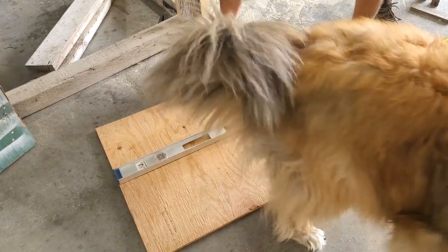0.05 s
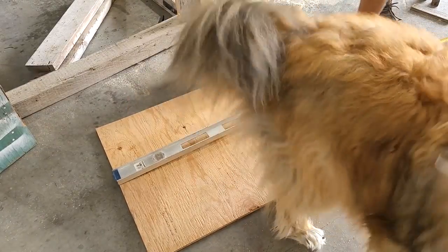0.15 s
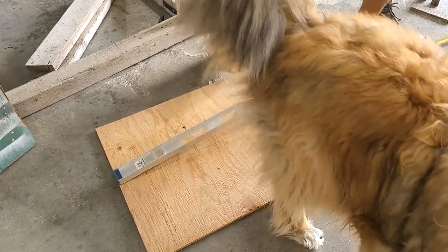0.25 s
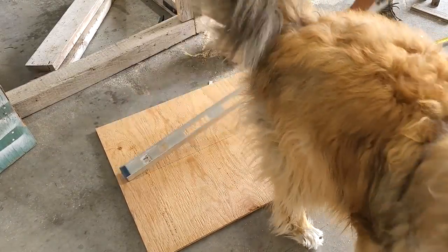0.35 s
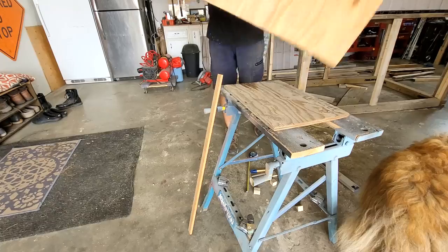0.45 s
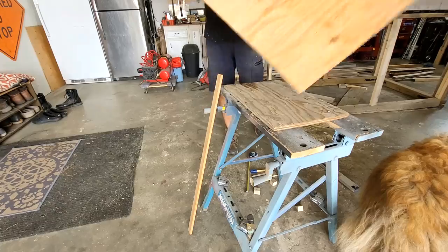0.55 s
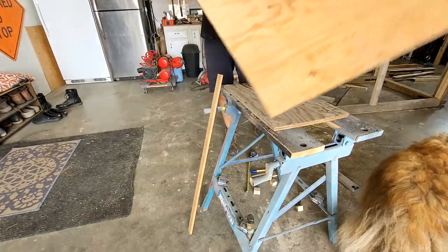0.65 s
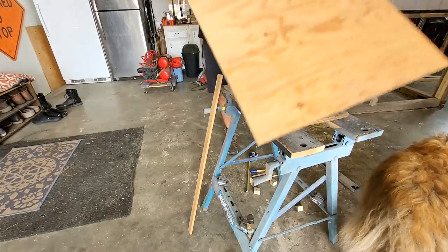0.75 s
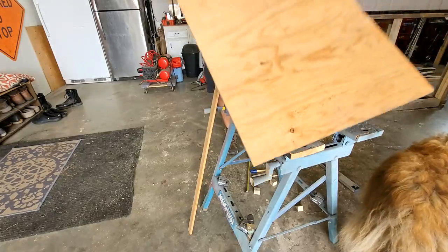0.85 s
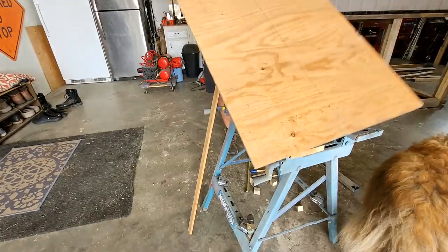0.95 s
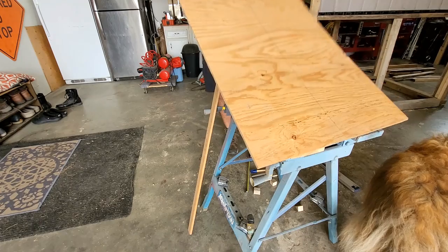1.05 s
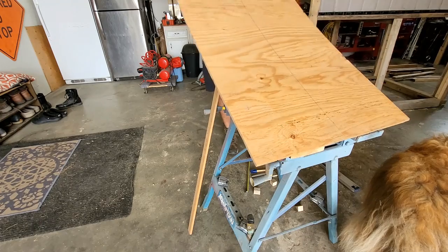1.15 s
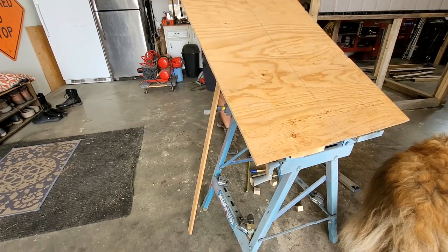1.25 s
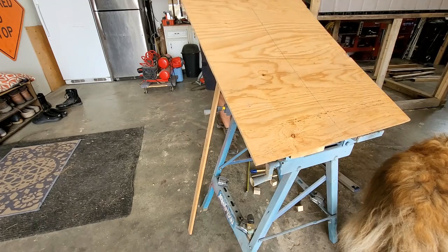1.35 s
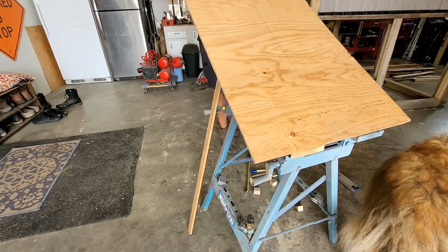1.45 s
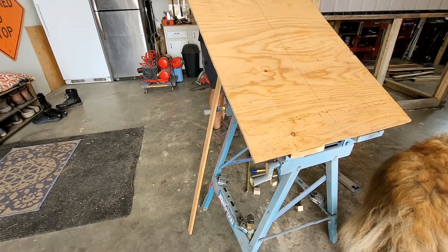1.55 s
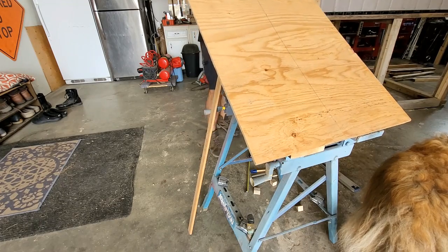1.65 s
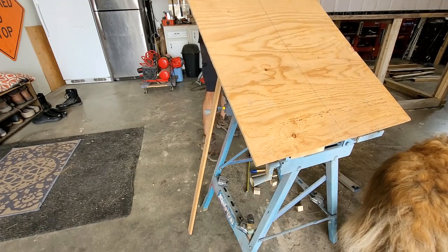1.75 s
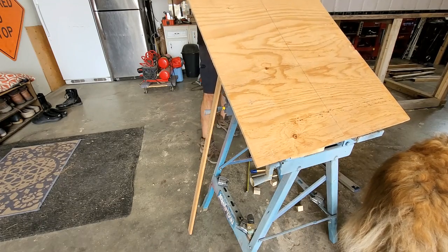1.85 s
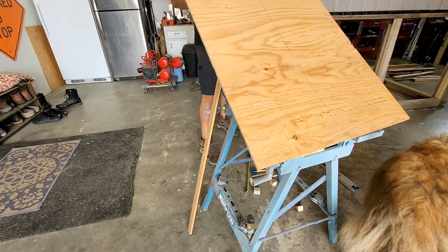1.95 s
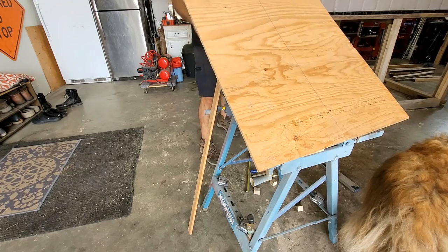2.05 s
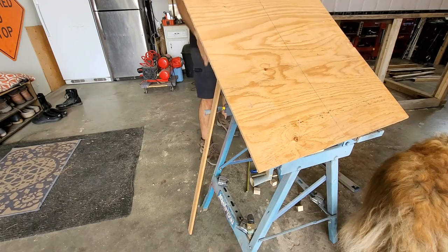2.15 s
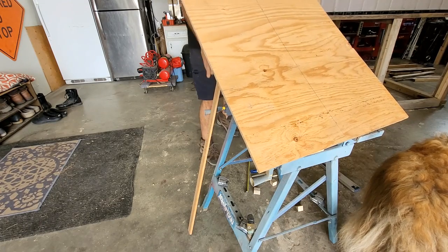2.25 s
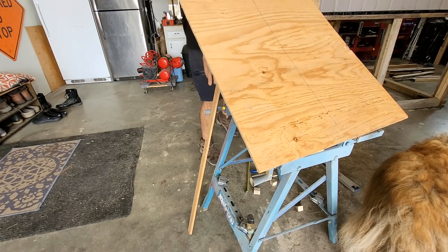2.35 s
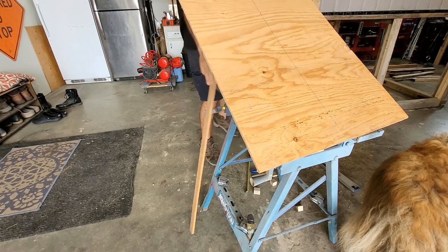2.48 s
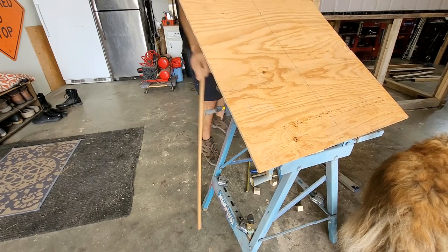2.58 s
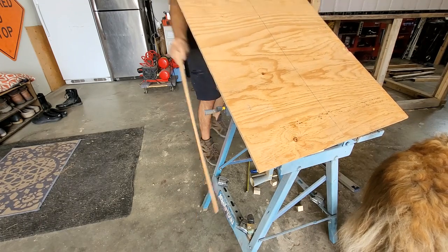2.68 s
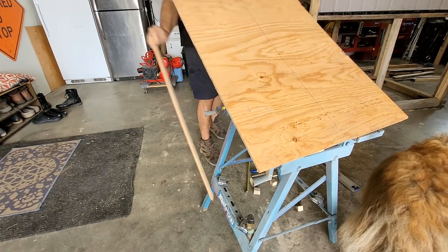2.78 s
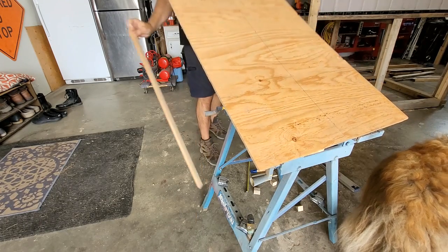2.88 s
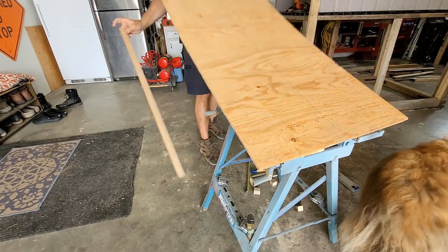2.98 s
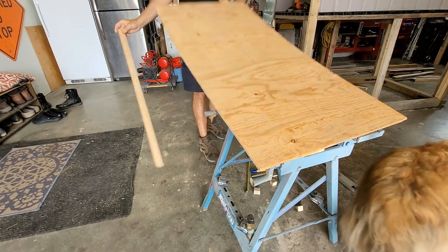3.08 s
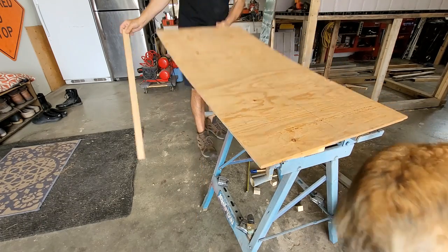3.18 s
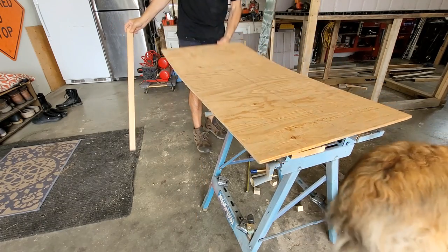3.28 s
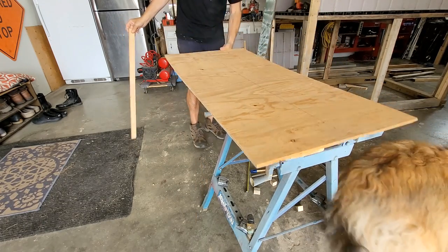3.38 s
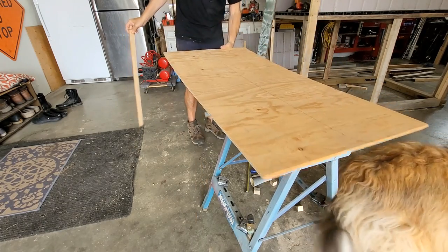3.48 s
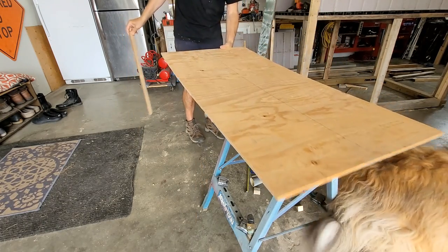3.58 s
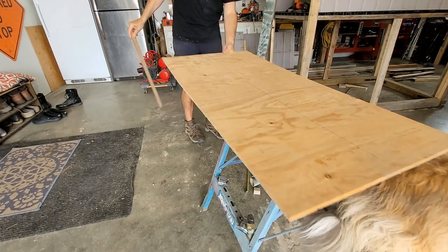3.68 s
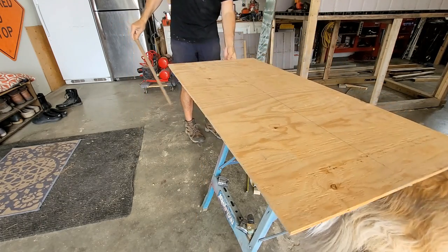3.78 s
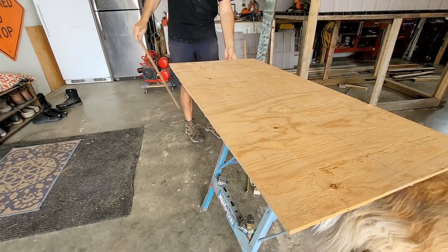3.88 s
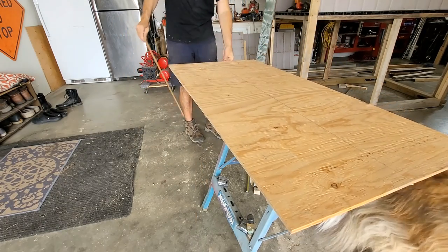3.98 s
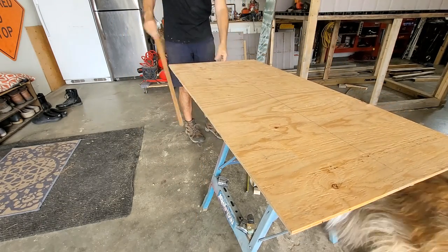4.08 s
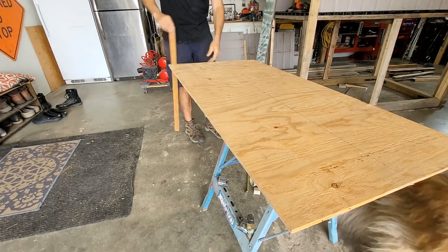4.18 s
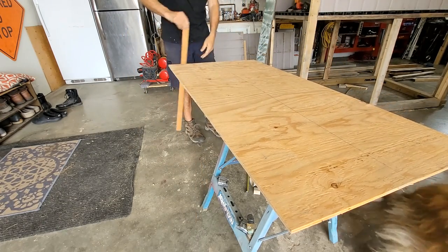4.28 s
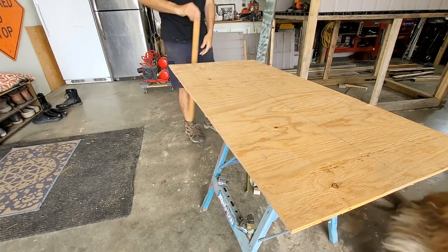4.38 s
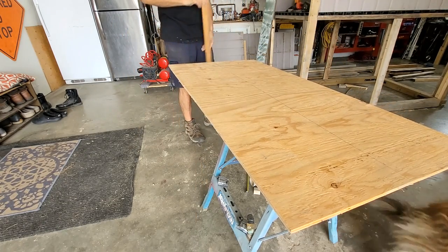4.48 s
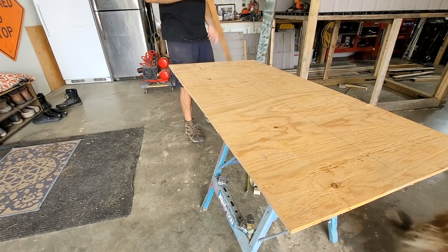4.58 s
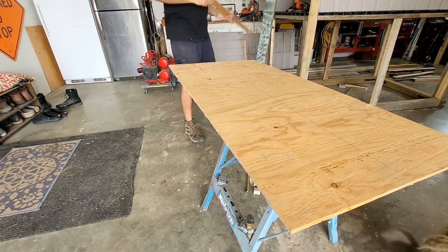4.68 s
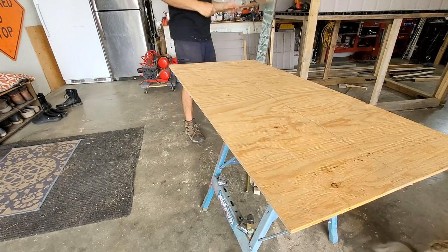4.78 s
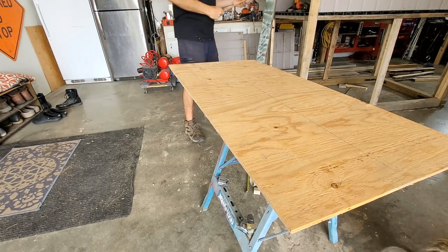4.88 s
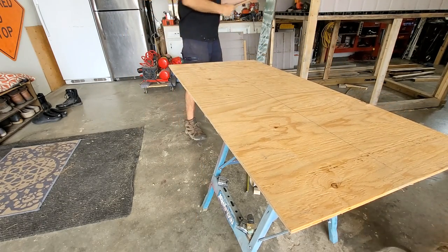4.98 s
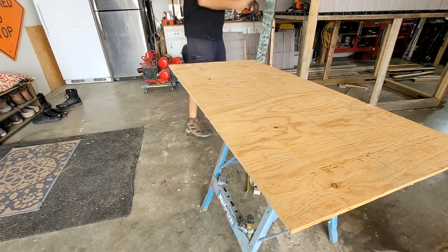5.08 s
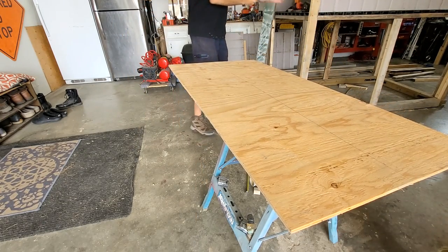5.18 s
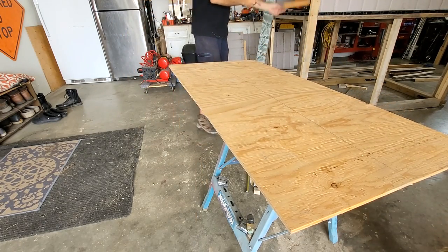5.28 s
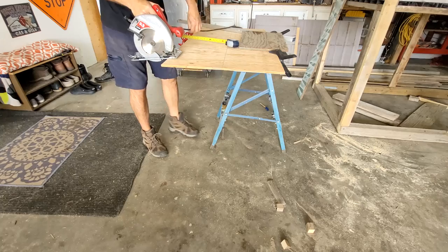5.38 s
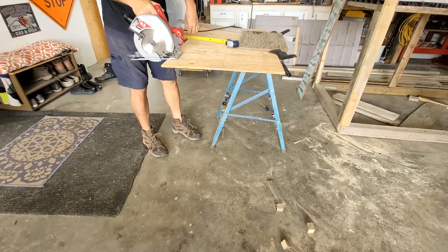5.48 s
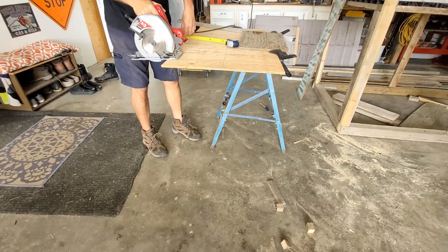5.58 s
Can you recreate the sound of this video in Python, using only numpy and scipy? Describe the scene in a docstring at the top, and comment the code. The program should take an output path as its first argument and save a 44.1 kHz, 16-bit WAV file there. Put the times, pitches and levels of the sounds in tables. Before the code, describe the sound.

A garage workshop with faint steady air, close stereo microphone and short diffuse echo. From 0 to 0.4 s, dull footfalls on concrete, a gritty sole scuff at about 0.3 and small ticks. The level dips at 0.47, then a soft low hum of a swinging plywood sheet fades until it lands at 0.88: loud, sharp cracks in a tight cluster with woody ringing, bounces to about 1.3, a rattle dying away and duller stick knocks. From 1.5 to 2.6, near quiet: slight nudges, cloth brushing, ticks, faint wavering tones. At 2.71 a hard, bright batten clack, quickly repeated. Around 3.15 the sheet drops with dull knocks, then scrapes in stuttering jerks from 3.3 to 3.8, with a deep thump at 3.67. Soft booms at 4.0 to 4.3, then faint brushes and a tick at 4.77. At 5.37 a dry double board knock, a brief dip, and faint movement in the remaining quiet.

```python
"""In a garage workshop, feet scuff on concrete (noise bursts), the level dips briefly and a plywood sheet
hums through the air. It drops on a folding workbench (ringing modes, noise bursts), bounces and settles.
A wooden batten clacks (snaps, high modes); the sheet is lowered, pushed along the bench top with stick-slip
noise and bumped into place. Last, a board is set down as the level dips again. Throughout, hands and
clothes brush the wood (shaped hiss), grit snaps, faint tones waver and the workshop air murmurs."""
import sys
import numpy as np
from scipy import signal
from scipy.fft import rfft, irfft, next_fast_len
from scipy.io import wavfile
from scipy.ndimage import uniform_filter1d

SR = 44100
rng = np.random.default_rng(int(sys.argv[2]) if len(sys.argv) > 2 else 0)


def dump(signal):
    """Clip the signal to [-1, 1] and save it as 16-bit WAV at the path in sys.argv[1]."""
    limited = np.clip(np.atleast_2d(signal).T, -1, 1)
    pcm = np.round(limited * 32767).astype(np.int16)
    wavfile.write(sys.argv[1], SR, pcm)


N = 248724
TIME = np.arange(N) / SR  # seconds
RING = np.arange(SR) / SR  # seconds since a blow

# Jolts of the plywood sheet. Each row: start in seconds, level in dB, bending boom and edge crack
# in dB against that level, before each layer's trim.
SHEET_BLOWS = [(0.582, -63, 18, -14.5), (0.882, -20.5, -18.5, -9.5), (0.897, -16.5, -28, -7),
               (0.913, -32, -10, -15), (0.952, -17.5, -23, -7), (0.974, -38, -14, -10),
               (0.987, -22, -42, -16), (1.004, -34, -1, -7), (1.059, -36.5, -1, -9),
               (1.079, -24, -12, -12.5), (1.096, -31, -9, -7), (1.158, -31, -20, -10), (1.174, -31, -5, -8),
               (1.229, -41.5, -9, 0), (1.322, -35.5, -4, -14.5), (1.38, -48, 2, -8), (1.44, -49.5, -7, -13),
               (3.138, -36, -24, -21), (3.149, -38.5, -9, 4), (3.16, -27.5, -0.5, -17.5),
               (3.235, -40.5, -17, -9), (3.286, -36, -15, -37.5), (3.426, -36.5, -14, -25),
               (3.545, -43.5, 5, -16), (3.664, -37, 2.5, -19), (3.727, -35.5, 3, -11.5),
               (3.8, -43.5, 3, -6.5), (4.007, -47, 8, -14), (4.022, -46, 1.5, -32.5),
               (4.191, -44.5, 4, -16), (4.214, -50.5, 5, -26), (4.268, -54.5, 5, -22.5),
               (4.345, -64.5, 3, -19), (4.5, -65, -1, -28), (4.812, -65, -6.5, -7)]
# Knocks of the batten. Each row: start in seconds, level in dB, contact hardness in Hz, dry snap in dB
# against that level, extra damping by the contact as t60 in seconds.
BATTEN_BLOWS = [(1.061, -27, 2850, -1, 0.05), (1.1867, -34.5, 3170, -8, 0.072),
                (1.265, -31, 2970, -2, 0.09), (2.7136, -23, 11050, -9.5, 2), (2.719, -23.5, 14200, -9, 8),
                (2.728, -24.5, 4400, -5, 0.69), (2.746, -36, 5000, -9.5, 0.26), (3.013, -49, 3800, -12, 4),
                (3.035, -52, 1480, -19, 4), (3.094, -49.5, 1930, -3.5, 4), (3.507, -38, 3500, -10, 0.2)]
# A board is set down. Each row: start in seconds, level in dB before panning.
BOARD_BLOWS = [(5.372, -30), (5.379, -32), (5.476, -59.5)]
# Grit and splinters snap. Each row: start in seconds, level in dB before the low cut, after-hiss in dB
# against that level, low cut in Hz.
GRIT_TICKS = [(0.1062, -37, -9, 1490), (0.2, -58.5, -10, 597), (1.094, -35.5, 4, 5020),
              (1.323, -45, 0, 4870), (1.751, -47.5, -20, 1490), (2.189, -62.5, -13, 2980),
              (3.163, -37.5, -14, 1480), (3.509, -37.5, -8, 2500), (4.412, -60, -7, 6490),
              (4.7663, -45.5, -8.5, 2910), (5.004, -62.5, -18, 3000), (5.546, -64, -19, 7000),
              (5.561, -72, -23, 5020), (5.567, -60.5, -11.5, 1500)]
# Footfalls on the concrete. Each row: start in seconds, level in dB.
FOOTFALLS = [(0.0, -47.5), (0.082, -50.5), (0.117, -45), (0.198, -49), (0.367, -36), (0.391, -42.5),
             (5.427, -46)]
# Low thumps: the bench frame takes weight, and late heavy footfalls. Each row: start in seconds, level in dB.
LOW_THUMPS = [(0.889, -50.5), (3.191, -48), (3.666, -30.5), (4.203, -46.5), (4.820, -64), (4.853, -62),
              (5.431, -58)]

# Modes that ring after a blow, in order: slow bending of the sheet, its higher modes, the batten,
# the low thumps, the board. Each row: pitch in Hz, level in dB, t60 in seconds.
BENDING_MODES = [(103, -11, .12), (121, -3, .13), (136, 0, .18), (151, -1, .14), (172, -8, .12),
                 (238, -11, .12), (294, -13, .14)]
SHEET_MODES = [(246, -13, .16), (294, -9, .2), (338, -6, .2), (358, -1.5, .26), (393, -4, .2),
               (426, -7, .18), (447, -6, .2), (494, -5, .22), (529, -7, .22), (590, -11, .24),
               (652, 0, .21), (748, -5.5, .26), (831, -10, .22), (873, -10, .22), (927, -8, .23),
               (980, -9, .2), (1334, -10, .2)]
BATTEN_MODES = [(290, -1, .2), (413, -9, .55), (445, -8, .22), (536, -7, .26), (1055, 0, .24),
                (1153, -3, .2), (1427, -4, .18), (1523, -3, .42), (1640, -4, .13), (1672, 4, .19),
                (1769, 1, .16), (1885, -4, .15), (2030, -7, .18), (2169, -5, .2), (2340, -4, .16),
                (2476, -3, .2), (2646, 4, .22), (3176, -5, .2), (3585, -6, .16), (3920, -6, .15),
                (4228, -5, .16), (4840, -11, .18), (5335, -7, .14)]
THUMP_MODES = [(52, -8, .18), (61, 5.5, .27), (73, -2, .12), (98, 7, .1), (140, 4, .1)]
BOARD_MODES = [(430, -7, .08), (500, -5, .08), (620, -10, .06), (775, -11, .06), (900, -9, .06),
               (1120, -1, .045), (1292, 3, .045), (1510, -5, .05), (3946, -22, .12)]

# Spectra that colour the noise of each named layer. Each row: frequency in Hz, relative level in dB per Hz.
SHEET_BODY = [(25, -39.5), (60, -14.5), (120, 3.5), (200, -11), (360, 4), (650, -17), (1000, -12),
              (1600, -44), (4000, -41.5)]
SHEET_CRACK = [(400, -31.5), (1000, -6), (1900, -4), (3000, -13), (5000, -15.5), (7500, -19), (9000, -23.5),
               (16000, -21.5)]
RATTLE_BODY = [(200, -15.5), (450, -7.5), (1000, -4), (1900, -7), (3000, -15), (5000, -17), (7500, -18),
               (9000, -23), (16000, -25)]
BATTEN_BODY = [(30, -47), (60, -25.5), (110, -12), (220, -17.5), (320, -8), (520, -14.5), (800, -17.5),
               (1150, -17), (2200, -17.5), (3000, -20.5), (7500, -16), (9000, -25), (12000, -16.5),
               (16000, -22.5)]
BATTEN_SNAP = [(200, -13.5), (600, -6), (1200, 0), (2200, -3), (3400, 0.5), (5000, -11.5), (16000, -26)]
BOARD_BODY = [(30, -48), (100, -27), (300, -10), (480, -5), (750, -9.5), (1250, -10), (2000, -22.5),
              (5500, -15), (6800, -7), (8000, -14.5), (16000, -24)]
TICK_BODY = [(500, 22.5), (2000, -3), (6500, 13.5), (9000, 11), (13000, 14), (16000, 8.5)]
STEP_BODY = [(25, -8), (60, -6.5), (150, -7.5), (250, 1.5), (700, -5), (1400, -2.5), (2300, -7),
             (3500, -18), (10000, -21)]
SCUFF_GRIT = [(200, -37), (420, -11.5), (900, -19.5), (1600, -19.5), (2300, 0.5), (3200, -4.5),
              (4400, -0.5), (6000, -14), (7800, -34.5), (9000, -38.5), (16000, -37)]
SLIDE_HISS = [(500, -11.5), (1000, -11.5), (1800, 1.5), (2800, -2), (5000, -1.5), (7700, 0), (8800, -13.5),
              (12000, -10), (16000, -17.5)]
SLIDE_BODY = [(25, -17), (60, -4), (130, 17.5), (210, 9.5), (330, 13.5), (650, 5), (1000, 9), (1800, -5),
              (4000, -55)]
BRUSH_HISS = [(300, -4), (1200, -3.5), (2500, -4), (5500, -3), (7700, 0.5), (9200, -4.5), (13000, -1.5),
              (16000, -9)]
SHOP_AIR = [(20, -15.5), (40, -3), (150, -8), (400, -11), (700, -15.5), (1000, -11), (1400, -22.5),
            (2200, -20), (3500, -25), (5200, -25.5), (7700, -20.5), (9000, -28), (16000, -23.5)]
# Stereo width at the two microphone ports. Each row: frequency in Hz, side against mid in dB.
STEREO_WIDTH = [(60, -21), (130, -15.5), (260, -16.5), (520, -9), (1000, -2.5), (4000, 0.5)]

# The sheet is nudged, later pushed along the bench: one list per push. Each row: time in seconds,
# body rumble in dB, surface hiss in dB, before each layer's trim.
SLIDES = [
    [(1.47, -61, -63), (1.62, -78, -102), (1.67, -66.5, -81), (1.76, -62.5, -63), (1.798, -68.5, -66.5),
     (2.17, -64, -79), (2.24, -70, -82.5), (2.3, -89, -92)],
    [(3.28, -62, -59), (3.38, -49, -48.5), (3.435, -46, -43.5), (3.6, -39.5, -44), (3.69, -42.5, -41.5),
     (3.755, -39, -44), (3.81, -48, -48), (3.874, -79, -70), (3.98, -55, -95)],
]
# Short resonant scrapes: the sheet catching as it slides, then two faint late scuffs. Each row: peak time
# in seconds, swell length in seconds, level in dB, resonance in Hz, rasp in dB against that level.
SCRAPES = [(1.885, 0.042, -65, 362, -20), (1.97, 0.08, -62, 376, -14), (2.106, 0.041, -63.5, 367, -20),
           (3.431, 0.017, -39.5, 410, -7), (3.523, 0.034, -42.5, 663, -9), (3.528, .025, -41, 950, -7),
           (3.594, 0.04, -50, 960, 7), (3.63, 0.02, -37.5, 680, -25), (3.633, 0.017, -42, 1800, -19),
           (3.695, 0.018, -45.5, 1060, 2), (3.721, 0.033, -37, 660, -20), (3.73, 0.02, -59, 1100, -10),
           (3.762, 0.013, -39, 950, 0), (4.11, .055, -63.5, 1800, -6), (4.336, 0.04, -74, 1180, -32)]
# A sole drags over the gritty floor. One row: start, attack, hold and release, all in seconds.
SCUFF = (0.2464, 0.036, 0.038, 0.13)
# Hands and clothes brush along the wood. Each row: start, attack, hold and release in seconds,
# level in dB, top octave in dB against that level, before the layer trims.
BRUSHES = [(0.198, 0.16, 0.054, 0.039, -41, -13), (0.437, 0.1, 0.038, 0.027, -54.5, 2),
           (0.538, 0.074, 0.068, 0.25, -51, -10.5), (1.207, .02, 0.033, .06, -53.5, -12),
           (1.37, 0.031, 0.083, 0.2, -62, -18), (1.616, 0.058, 0.081, 0.01, -57.5, -5.5),
           (2.58, 0.077, 0.029, 0.077, -59.5, -13.5), (3.046, 0.14, 0.016, 0.11, -49.5, -16.5),
           (3.882, 0.035, 0.033, 0.13, -55, -16.5), (4.065, 0.0069, 0.011, 0.12, -59.5, -14),
           (4.215, 0.045, 0.023, .04, -76, -7), (4.678, 0.045, 0.029, 0.14, -62.5, -1),
           (4.934, 0.11, 0.024, 0.21, -63, -21.5), (5.134, 0.054, 0.009, 0.062, -68, -7),
           (5.41, 0.033, 0.16, .2, -74, -18)]
# Faint background tones that swell and waver. Each row: peak time in seconds, swell length in seconds,
# level in dB, pitch in Hz, width in Hz of each of two filter passes.
FAINT_TONES = [(2.353, 0.16, -74.5, 1040, 120.6), (2.36, .06, -85.5, 2586, 160),
               (2.525, 0.1, -72, 998, 110), (2.54, 0.088, -80, 2030, 110), (4.672, 0.07, -68, 897, 300),
               (4.788, 0.088, -76, 2020, 132), (5.1, 0.13, -74.5, 860, 250.5),
               (5.26, 0.056, -80.5, 2010, 50), (5.613, 0.043, -69.5, 883, 149)]
# Brief dips of the level. Each row: lowest point in seconds, fade-out in seconds, fade-in in seconds.
LEVEL_DIPS = [(0.466, 0.034, 0.035), (5.411, 0.076, 0.08)]

BOOM_LAG_S, BOOM_RISE_S = 0.013, 0.007  # the slow bending builds up after the contact
# the dropped sheet chatters on the bench top, ever more weakly, until it lies still
LANDING_S, SETTLE_S, CHATTER_COUNT = 0.884, 0.55, 14
CHATTER_DB, CHATTER_FALL_DB_PER_S, CHATTER_BOOM_DB, CHATTER_CRACK_DB = -33, 42.5, -6.5, -18.5
RATTLE_DB, RATTLE_FALL_DB_PER_S = -37, 42
# the sheet hums as it is swung through the air, and the hum dies away
SWING_S, SWING_HZ, SWING_FALL_DB_PER_S = 0.47, 135.7, 32.5
# the sliding edge sticks and lets go at an uneven rate
SHUDDER_HZ, SHUDDER_JITTER, SHUDDER_DB = 56, 0.23, 1
ROOM_T60_S, ROOM_TREBLE_T60_S = 0.42, 0.31
PORT_LAG_SAMPLES = 3
SHOP_DB = -72.5
TOP_HZ = 16100


def sheet_blows(modes_db=-11.5, body_db=-4.5, boom_db=-1, crack_db=-2, hard_hz=16000, hard_db=-20):
    """Each landing bends the whole sheet, rings its higher modes and cracks at the touching edge."""
    out = np.zeros((2, N))
    for s, db, boom, crack in list(SHEET_BLOWS) + chatter():
        bend = ring(BENDING_MODES, scatter_db=2.5, detune=0.006) * (1 - np.exp(-RING / BOOM_RISE_S))
        modes = amp(modes_db) * ring(SHEET_MODES, scatter_db=3, detune=0.006)
        body = amp(body_db) * crowd(SHEET_BODY, t60=0.032, tail_db=-24, tail_t60=0.28)
        edge = amp(crack + crack_db) * crowd(SHEET_CRACK, t60=0.27, tail_db=-16.5, tail_t60=0.073)
        # gentler contacts are duller
        contact_hz = hard_hz * np.sqrt(amp(db + crack - hard_db))
        add(out, s, amp(db) * soften(modes + body + edge, contact_hz))
        add(out, s + BOOM_LAG_S, amp(db + boom + boom_db) * bend)
    return out


def chatter(scatter_db=2):
    """Small, unevenly spaced rebounds after the landing, as rows like those of SHEET_BLOWS."""
    slip, size = rng.uniform(-1, 1, (CHATTER_COUNT, 2)).T
    age = SETTLE_S * (np.arange(CHATTER_COUNT) + 1 + slip / 2) / CHATTER_COUNT
    levels = CHATTER_DB - CHATTER_FALL_DB_PER_S * age + scatter_db * size
    return [(LANDING_S + s, db, CHATTER_BOOM_DB, CHATTER_CRACK_DB) for s, db in zip(age, levels)]


def rattle():
    """The settling sheet grinds on the bench in a dense, woody clatter."""
    contact = noise(N) * flicker(rate=520, depth_db=3)
    fall = dying(LANDING_S, TIME[-1], RATTLE_DB, RATTLE_FALL_DB_PER_S)
    return fall * shifting(colour(contact, RATTLE_BODY))


def low_thumps():
    """Weight on the bench frame, and late heavy footfalls, heard as a few low ringing modes."""
    out = np.zeros((2, N))
    for s, db in LOW_THUMPS:
        add(out, s, amp(db) * ring(THUMP_MODES, scatter_db=1.5, detune=0.008))
    return out


def swing(level_db=-40, flex_db=-15):
    """The free sheet hums at one low pitch and rumbles softly as it flexes."""
    hum = np.sqrt(2) * np.sin(2 * np.pi * SWING_HZ * TIME)
    flex_spectrum = [(25, -25.5), (60, 15.0), (130, 4.5), (300, 9.5), (700, -10.5), (2000, -18.5), (5000, -43)]
    flex = unit(colour(noise(N), flex_spectrum))
    return dying(SWING_S, LANDING_S, level_db, SWING_FALL_DB_PER_S) * (hum + amp(flex_db) * flex)


def slide(modes_db=-8, body_db=1, hiss_db=2.5):
    """Wood fibres stick and slip: dense slips, bunched by the shudder, drive the modes and hiss."""
    jerk = shudder()
    slips = noise(N) * flicker(rate=600, depth_db=3) * flicker(rate=70, depth_db=1.2) * np.sqrt(jerk)
    judder = slips * jerk
    # the higher modes ring shorter here than after a blow
    short_ring = ring(SHEET_MODES, scatter_db=2, detune=0.006) * decay(0.2)
    modes = unit(signal.fftconvolve(judder, short_ring[None], axes=1)[:, :N])
    bend_ring = ring(BENDING_MODES, scatter_db=1.5, detune=0.004)
    bend = unit(signal.fftconvolve(judder[0], bend_ring)[:N])
    body = amp(modes_db) * shifting(modes) + amp(body_db) * shifting(colour(judder, SLIDE_BODY))
    hiss = amp(hiss_db) * shifting(colour(slips, SLIDE_HISS))
    out = 0
    for push, bend_db in zip(SLIDES, (-12, -5)):  # the firm push bends the sheet more than the first nudge
        s, rumble_db, surface_db = np.transpose(push)
        out = out + envelope(s, rumble_db) * (body + amp(bend_db) * bend)
        out = out + envelope(s, surface_db) * hiss
    return out


def shudder():
    """Gain of stick-slip: each slip starts strongly and fades until the edge lets go again."""
    rate = SHUDDER_HZ * np.exp(SHUDDER_JITTER * wander(SHUDDER_HZ))
    phase = np.cumsum(rate) / SR % 1
    return unit(uniform_filter1d(amp(-SHUDDER_DB * phase), size=60))


def scrapes():
    """Short scrapes of the sliding sheet and two faint late scuffs: jerky noise rings one resonance each."""
    jerks = noise(N) * flicker(rate=420, depth_db=4)
    rasp = unit(resonate(resonate(jerks, 2400, 0.6), 2400, 0.6))
    out = 0
    for s, length, db, hz, rasp_db in SCRAPES:
        grain = unit(resonate(jerks, hz, 6)) + amp(rasp_db) * rasp
        out = out + amp(db) * swell(s, length) * grain
    return out


def batten_blows(modes_db=-8.0, body_db=-4.5, snap_t60=0.004):
    """A hard, light stick snaps dryly and rings high; the ring dies fast where it stays pressed to the wood."""
    out = np.zeros((2, N))
    for s, db, hz, snap_db, damped_t60 in BATTEN_BLOWS:
        # each channel hears its own balance of modes
        modes = np.array([ring(BATTEN_MODES, scatter_db=2, detune=0.003) for _ in range(2)])
        body = crowd(BATTEN_BODY, t60=0.075, tail_db=-11.5, tail_t60=0.42)
        clack = amp(modes_db) * modes + amp(body_db) * body
        burst = colour(noise(len(RING)), BATTEN_SNAP) * decay(snap_t60)
        snap = amp(snap_db) * unit_attack(burst, size=500)
        add(out, s, amp(db) * soften(clack * decay(damped_t60) + snap, hz))
    return out


def board_knocks(pan_db=-2, modes_db=-2, body_db=-3):
    """Short woody knocks of a board: damped modes over a dense noise burst, close by without echo."""
    out = np.zeros((2, N))
    for s, db in BOARD_BLOWS:
        modes = amp(modes_db) * ring(BOARD_MODES, scatter_db=1, detune=0.01)
        body = amp(body_db) * crowd(BOARD_BODY, t60=0.04, tail_db=-12.5, tail_t60=0.22)
        add(out, s, amp(db) * pan(pan_db) * (modes + body))
    return out


def brushes(soft_db=-2, crisp_db=7.5):
    """Skin and cloth rub the wood: each stroke mixes a soft hiss with its own share of crisp top."""
    fibres = noise(N) * flicker(rate=5000, depth_db=3.5)  # at this rate the flicker stops after 1.6 s
    hiss = colour(fibres, BRUSH_HISS)
    soft = unit(colour(hiss, [(7800, 7.0), (9500, -20.5)]))
    crisp = unit(colour(hiss, [(6000, -22), (9500, -10.5)]))
    out = 0
    for s, attack, hold, release, db, top_db in BRUSHES:
        rub = amp(soft_db) * soft + amp(top_db + crisp_db) * crisp
        out = out + amp(db) * stroke(s, attack, hold, release) * rub
    return out


def steps(roll_s=0.0014):
    """Soles roll onto the floor with a dull, spread-out slap."""
    out = np.zeros((2, N))
    for s, db in FOOTFALLS:
        slap = crowd(STEP_BODY, t60=0.13, tail_db=-1.5, tail_t60=0.15)
        add(out, s, amp(db) * (1 - np.exp(-RING / roll_s)) * slap)
    return out


def scuff(level_db=-32):
    """Grit rolls under a dragged sole."""
    grit = noise(N) * flicker(rate=900, depth_db=1.5)
    return amp(level_db) * stroke(*SCUFF) * unit(colour(grit, SCUFF_GRIT))


def grit_ticks():
    """Grit and splinters snap close by: very short noise bursts with a hissing tail and no bass."""
    out = np.zeros((2, N))
    for s, db, hiss_db, low_hz in GRIT_TICKS:
        snap = crowd(TICK_BODY, t60=0.011, tail_db=hiss_db, tail_t60=0.22)
        low_cut = signal.butter(3, low_hz, "high", fs=SR, output="sos")
        add(out, s, amp(db) * signal.sosfilt(low_cut, snap))
    return out


def faint_tones():
    """Thin, unsteady tones come and go far away: noise passed twice through a narrow resonance."""
    hiss = noise(N)
    out = 0
    for s, length, db, hz, width in FAINT_TONES:
        tone = unit(resonate(resonate(hiss, hz, hz / width), hz, hz / width))
        out = out + amp(db) * swell(s, length) * tone
    return out


def shop_air():
    """The workshop's faint, nearly steady background."""
    return amp(SHOP_DB) * unit(colour(noise(N), SHOP_AIR)) * flicker(rate=4, depth_db=0.8)


def room(x, wet_db):
    """Direct sound plus the short, diffuse echo of the workshop, which loses its treble first."""
    echo_spectrum = [(50, -2.5), (150, -4), (260, 1.5), (600, -2.0), (4000, -5.0), (14000, -8.0)]
    diffuse = colour(noise(len(RING)), echo_spectrum)
    low = colour(diffuse, [(2200, 0), (7000, -20)])
    echo = low * decay(ROOM_T60_S) + (diffuse - low) * decay(ROOM_TREBLE_T60_S)
    echo = echo * (RING > 0.006)  # the first reflections arrive after 6 ms
    echo /= np.sqrt(np.sum(echo ** 2) / 2)
    return x + amp(wet_db) * signal.fftconvolve(x, echo, axes=1)[:, :N]


def from_right(x):
    """The bench stands a little to the right, so its sound reaches the left port later."""
    return np.array([np.pad(x[0], (PORT_LAG_SAMPLES, 0))[:N], x[1]])


def pan(left_db):
    """Gains of the two channels for a source off centre."""
    return amp([[left_db / 2], [-left_db / 2]])


def ring(modes, scatter_db, detune):
    """Modes after one blow; their strength and pitch shift with the point of contact."""
    chance = rng.standard_normal((len(modes), 2))
    total = 0
    for k, ((hz, db, t60), (a, b)) in enumerate(zip(modes, chance)):
        tone = np.sin(2 * np.pi * hz * (1 + detune * b) * RING) * decay(t60)
        total = total + (-1) ** k * amp(db + scatter_db * a) * tone  # neighbours start in opposite phase
    return unit_attack(total)


def crowd(spectrum, t60, tail_db, tail_t60):
    """Modes too dense to tell apart: a noise burst with one decay, plus a duller tail with another."""
    burst = colour(noise(len(RING)), spectrum)
    dull = colour(burst, [(3000, 16.5), (7000, 3.5), (14000, 0.0)])
    return unit_attack(burst * decay(t60) + amp(tail_db) * dull * decay(tail_t60))


def shifting(x):
    """As the point of contact travels, narrow resonances of the wood come and go."""
    bands = sum(resonate(x, hz, 15) * wander(rate=24) for hz in np.geomspace(300, 4200, 24))
    return unit(x + 0.8 * bands)


def resonate(x, hz, q):
    """One resonance, hz / q wide."""
    return signal.lfilter(*signal.iirpeak(hz, q, fs=SR), x)


def soften(x, hz):
    """A soft contact pushes for longer and so excites less above hz."""
    return signal.sosfilt(signal.butter(3, min(hz, 0.45 * SR), fs=SR, output="sos"), x)


def noise(size):
    """Diffuse stereo noise: alike in the bass, unrelated in the treble."""
    mid, side = rng.standard_normal((2, size))
    side = colour(side, STEREO_WIDTH)
    return np.array([mid + side, mid - side])


def colour(x, spectrum):
    """Filter by (Hz, dB) points joined on a log-frequency axis."""
    hz, db = np.transpose(spectrum)
    size = next_fast_len(x.shape[-1] + 4096)
    bins = np.maximum(np.arange(size // 2 + 1) * SR / size, 1)
    gain = amp(np.interp(np.log(bins), np.log(hz), db))
    return irfft(rfft(x, size) * gain, size)[..., :x.shape[-1]]


def stroke(start, attack, hold, release):
    """Gain of one rubbing movement: it speeds up, holds, then falls 20 dB in each release time."""
    rise = np.sin(np.pi / 2 * np.clip((TIME - start) / attack, 0, 1)) ** 2
    return rise * 10 ** (-np.maximum(TIME - start - attack - hold, 0) / release)


def swell(s, length):
    """A bell-shaped gain around time s."""
    return np.exp(-2 * ((TIME - s) / length) ** 2)


def dying(start, end, db, fall_db_per_s):
    """Gain that falls steadily from start to end."""
    return envelope([start, end], [db, db - fall_db_per_s * (end - start)])


def envelope(s, db):
    """Gain along a level curve, closing quickly outside it."""
    inside = 1.0 * ((TIME >= s[0]) & (TIME <= s[-1]))
    return amp(np.interp(TIME, s, db)) * uniform_filter1d(inside, size=500)


def decay(t60):
    """Exponential fall after a blow, 60 dB in t60 seconds."""
    return np.exp(-np.log(1000) * RING / t60)


def flicker(rate, depth_db):
    """A gain that wanders at random, rate times a second."""
    return amp(depth_db * wander(rate))


def wander(rate):
    """Random values of spread 1, rate a second, joined by lines; the last of 8192 is held."""
    return np.interp(TIME * rate, np.arange(8192), rng.standard_normal(8192))


def amp(db):
    """Decibels to gain."""
    return 10 ** (np.asarray(db) / 20)


def unit(x):
    """Scale to rms 1."""
    return x / np.sqrt(np.mean(x ** 2))


def unit_attack(x, size=1100):
    """Scale a ringing sound so that its first size samples have rms 1."""
    return x / np.sqrt(np.mean(x[..., :size] ** 2))


def add(out, s, sound):
    """Mix a sound in at time s."""
    start = max(int(s * SR), 0)
    part = sound[..., :N - start]
    out[:, start:start + part.shape[-1]] += part


def scene():
    """Blows and rubbing in the workshop, over its quiet air."""
    bench_blows = from_right(sheet_blows() + low_thumps() + batten_blows())
    blows = room(bench_blows + steps(), wet_db=-7.0)
    bench_rubbing = from_right(slide() + scrapes() + rattle())
    rubbing = room(bench_rubbing + scuff() + pan(left_db=-0.5) * brushes(), wet_db=-9.5)
    close = board_knocks() + grit_ticks() + swing()
    return blows + rubbing + close + faint_tones() + shop_air()


def record(dry):
    """The level dips briefly twice; the microphone loses the deepest bass and the top is cut."""
    for s, fall, rise in LEVEL_DIPS:
        distance = np.maximum((s - TIME) / fall, (TIME - s) / rise)
        dry = dry * np.clip(distance, 0.05, 1) ** 1.49
    dry = signal.sosfilt(signal.butter(2, 38, "high", fs=SR, output="sos"), dry)
    return signal.sosfilt(signal.ellip(10, 0.2, 80, TOP_HZ, fs=SR, output="sos"), dry)


dry = scene()
out = record(dry)
dump(out)
```